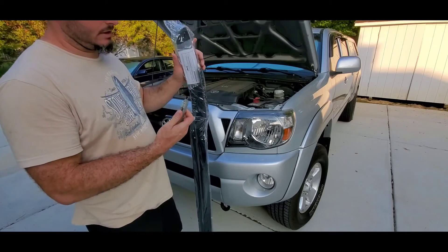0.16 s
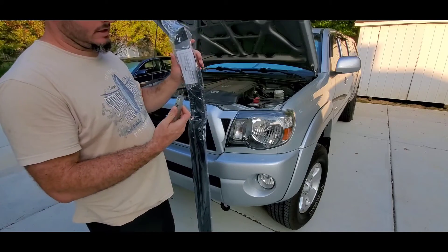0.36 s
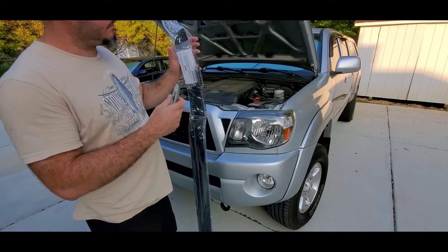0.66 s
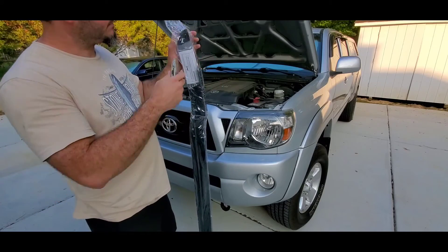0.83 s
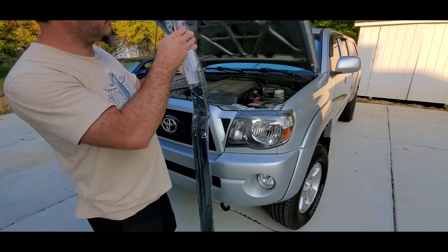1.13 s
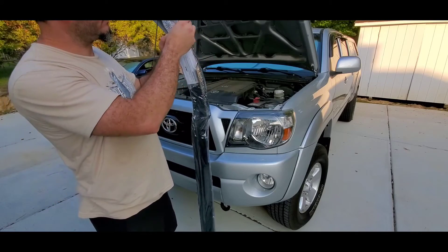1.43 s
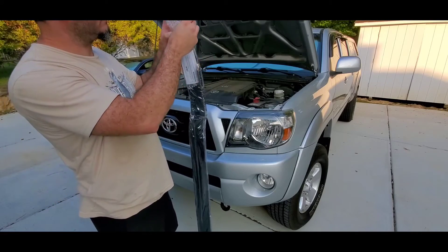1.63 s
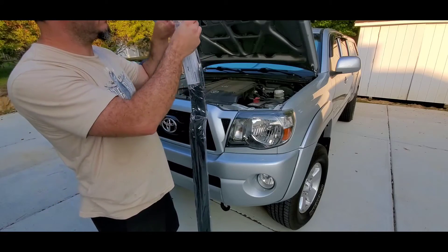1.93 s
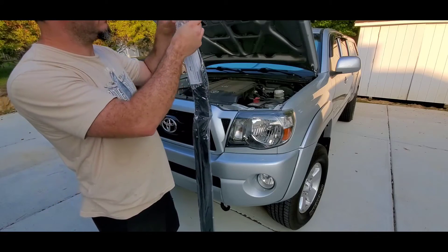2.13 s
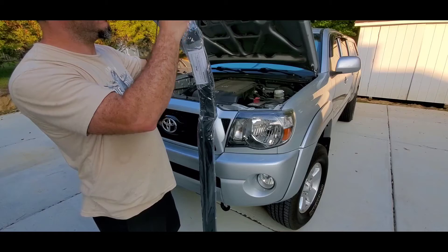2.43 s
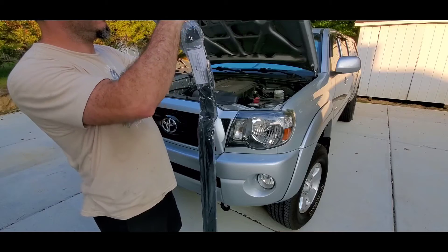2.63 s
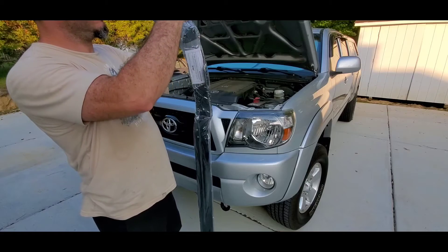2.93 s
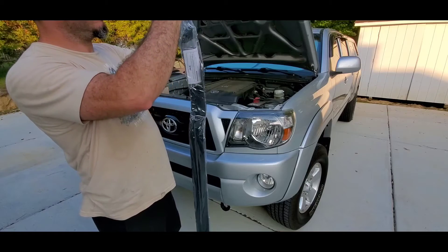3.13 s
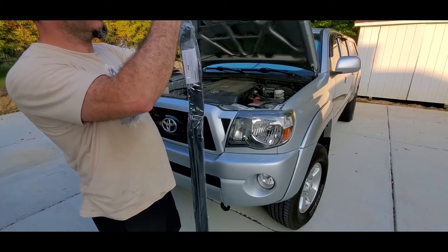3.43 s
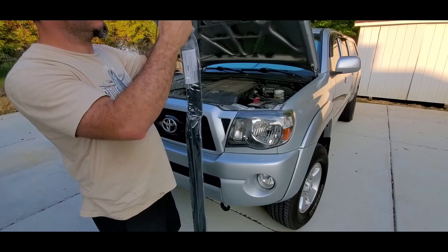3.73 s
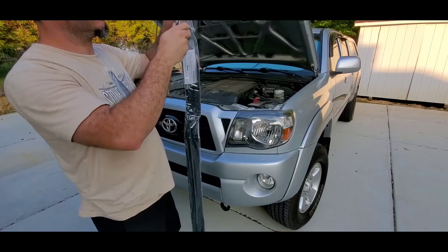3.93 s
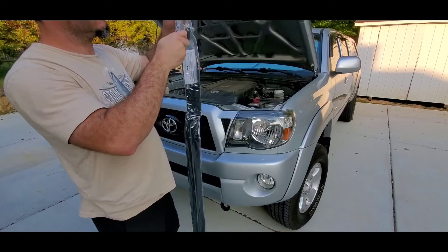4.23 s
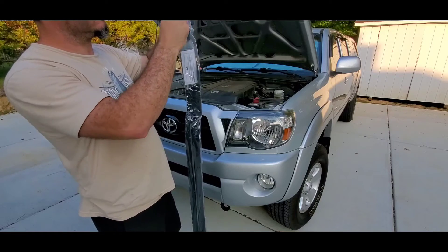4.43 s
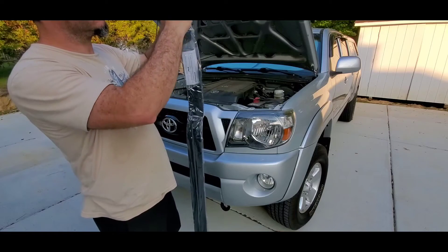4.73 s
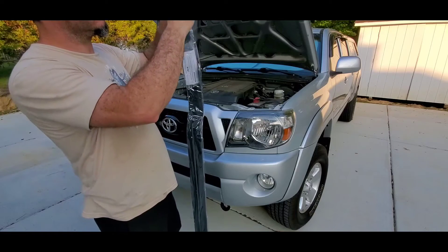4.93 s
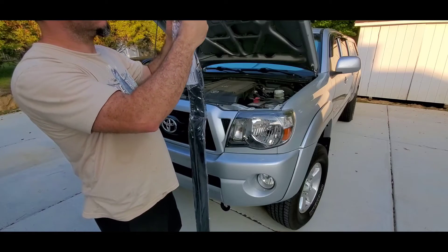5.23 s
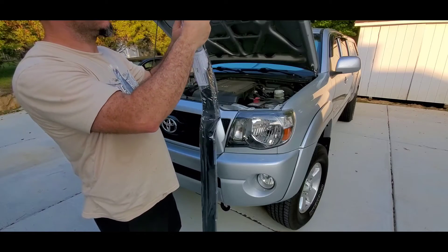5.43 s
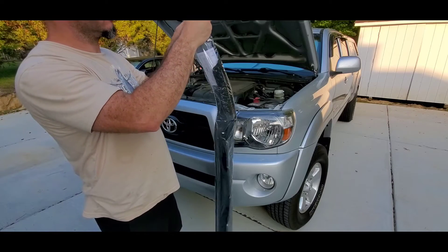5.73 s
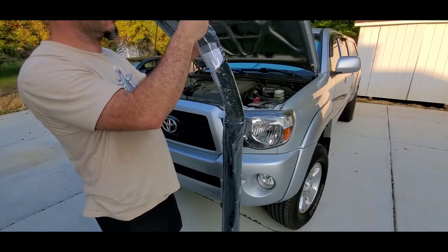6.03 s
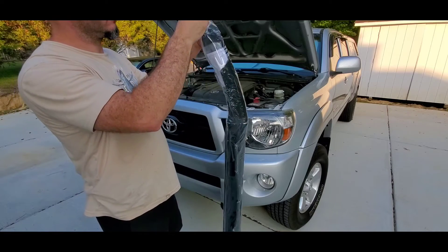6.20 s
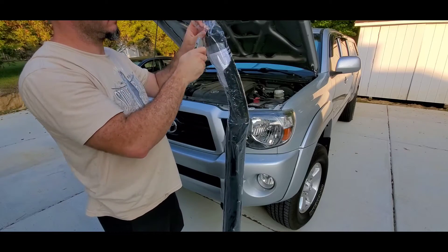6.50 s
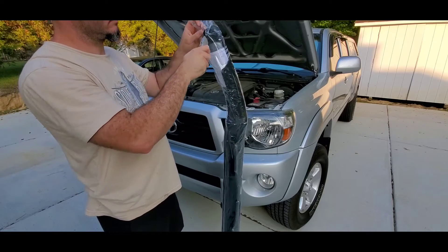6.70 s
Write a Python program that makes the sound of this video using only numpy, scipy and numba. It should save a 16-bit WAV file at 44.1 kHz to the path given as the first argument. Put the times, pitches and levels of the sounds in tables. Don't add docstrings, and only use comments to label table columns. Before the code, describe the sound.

Close, crisp stereo sound of plastic film being handled outdoors. A quick metal blade-lock click comes first, then near quiet, then irregular bursts of crinkling, crackling and bright snapping with deeper folds giving way. Brief gaps separate the pulls; the strongest cluster comes in the second half before fading to a lull and a last small rustle. Low far-off traffic and steady high insects remain underneath, with only short, tight outdoor reflections.

```python
import sys
import numpy as np
from scipy import signal
from scipy.fft import rfft, irfft, next_fast_len
from scipy.io import wavfile
from scipy.ndimage import map_coordinates
from numba import njit

SR = 44100
rng = np.random.default_rng(int(sys.argv[2]) if len(sys.argv) > 2 else 0)


def store_pcm(level_fs):
    pcm = np.round(np.clip(level_fs, -1, 1) * 32767).astype(np.int16)
    wavfile.write(sys.argv[1], SR, np.atleast_2d(pcm).T)


def to_linear_factor(level_db):
    exponent = np.asarray(level_db, float) / 20
    return 10 ** exponent


N = 302455

# lowest f/Hz, highest f/Hz, life/cycles
PANELS = [
    (327, 1967, 3.7),
    (1990, 7770, 4.55),
    (7330, 17200, 8.8),
]
# t/s, level/dB
FOLDS = [(.7398, -35), (0.9466, -13), (1.11, -13.5), (1.252, -31), (1.3544, -13.5), (1.5114, -29),
         (1.737, -22), (1.9476, -16.5), (2.1363, -20), (2.6751, -19.5), (1.7243, -20), (2.86, -21),
         (3.0496, -23.5), (3.077, -22), (3.2043, -17.5), (3.4742, -17), (3.687, -15), (3.7363, -19.5),
         (3.9899, -27.5), (4.1826, -10), (4.212, -13.5), (4.3019, -28.5), (4.6584, -21), (4.9485, -30),
         (5.378, -17.5), (5.6742, -12.5), (6.1743, -16), (1.277, -29.5), (6.7668, -22.5), (6.778, -22.5)]
# t/s, level/dB
CRACKS = [(1.0373, -10.5), (1.1352, -15.5), (1.164, -13), (1.439, -17.5), (1.7727, -22.5), (2.0004, -11),
          (2.3107, -15.5), (2.4328, -27), (2.7117, -7), (2.8253, -10.5), (2.888, -20), (2.9836, -18.5),
          (3.2618, -15), (3.287, -10), (6.4467, -37.5), (3.414, -16.5), (3.5135, -18), (3.6262, -17.5),
          (4.0212, -20), (4.1447, -10.5), (4.6927, -15.5), (4.9755, -15), (5.027, -12), (5.0519, -9),
          (5.1052, -20), (5.1549, -13), (5.2926, -12.5), (5.8312, -13.5), (6.1198, -13.5), (6.7336, -22.5)]
# t/s, level/dB
SPLITS = [(.9096, -21.5), (.969, -13.5), (1.3254, -17.5), (1.5513, -11.5), (1.6317, -14.5), (1.65, -17),
          (1.7853, -21), (1.8315, -27), (1.898, -25), (1.9126, -22), (2.096, -26.5), (3.9618, -27),
          (2.9087, -21), (3.1152, -18.5), (3.6067, -18), (4.151, -9), (4.4206, -30), (4.767, -15),
          (4.904, -14), (5.0197, -12), (5.2096, -12.5), (5.2355, -18.5), (5.2768, -10.5), (5.4954, -10),
          (5.5667, -9), (5.7834, -14), (6.0359, -14.5), (6.2158, -17.5), (6.272, -24), (6.5168, -31.5)]
# t/s, level/dB
POPS = [(.851, -27.5), (1.017, -12.5), (1.3216, -15.5), (1.4095, -13.5), (1.803, -19.5), (1.8665, -24.5),
        (1.9868, -9), (2.0108, -13.5), (2.054, -12), (2.18, -12.5), (2.4834, -17.5), (2.6319, -11),
        (2.801, -15), (3.085, -15), (3.6649, -17.5), (3.8324, -17), (3.8523, -16), (3.9242, -23),
        (4.387, -27.5), (4.5458, -21), (4.591, -20), (4.724, -11.5), (4.888, -16.5), (4.964, -16.5),
        (5.3622, -10.5), (5.5799, -6), (5.595, -9), (5.923, -11.5), (5.9946, -19.5), (6.8225, -19.5)]
# t/s, level/dB
TICKS = [(.8807, -14.5), (0.9885, -17.5), (1.046, -12.5), (1.6169, -21.5), (1.711, -18.5), (1.966, -23),
         (2.1321, -26), (2.2998, -14), (2.3497, -14.5), (2.4015, -25.5), (2.4505, -24.5), (2.6075, -16),
         (2.6176, -13.5), (2.9678, -18), (3.5634, -16), (3.751, -18.5), (4.1175, -25), (4.157, -8),
         (4.7375, -16.5), (4.8196, -12.5), (4.853, -15), (6.839, -21), (5.0104, -11.5), (5.425, -15),
         (5.5195, -10.5), (5.7644, -12), (6.753, -20), (6.11, -15), (6.2246, -18), (6.7186, -30)]
KINDS = (FOLDS, CRACKS, SPLITS, POPS, TICKS)


def unit(x):
    return x / np.sqrt(np.mean(x ** 2) + 1e-20)


def along(points, hz):
    f, v = np.transpose(points)
    return np.interp(np.log(hz + 1), np.log(f + 1), v)


def wobble(rate_hz):
    knots = rng.standard_normal(int(N * rate_hz / SR) + 4)
    return map_coordinates(knots, [np.arange(N) * rate_hz / SR])


def filtered(x, response):
    m = next_fast_len(N + 8192)
    return irfft(rfft(x, m) * response(np.fft.rfftfreq(m, 1 / SR)), m)[..., :N]


@njit
def add(out, start, step, size, length):
    for g in range(len(start)):
        z = size[g]
        for i in range(start[g], min(start[g] + length[g], len(out))):
            out[i] += z.imag
            z *= step[g]


def rings(s, hz, tau_s, size, lag_s, twist_rad):
    out = np.zeros((2, N))
    pole = (2j * np.pi * hz - 1 / tau_s) / SR
    step = np.exp(pole).ravel()
    length = (7 * tau_s * SR).astype(np.int64).ravel()
    ports = (out[0], s * SR, 0 * twist_rad), (out[1], (s + lag_s) * SR, twist_rad)
    for port, at, turn in ports:
        start = np.ceil(np.clip(at, 0, N)).astype(np.int64)
        first = size * np.exp(pole * (start - at) + 1j * turn)
        add(port, start.ravel(), step, first.ravel(), length)
    return out


def creases(s, size, panel, spread_s, count):
    low_hz, high_hz, cycles = panel
    u = rng.random((len(s), 3, count))
    n = rng.standard_normal((len(s), 3, count))
    hz = low_hz * (high_hz / low_hz) ** ((np.arange(count) + u[:, 0]) / count)
    tau_s = cycles * to_linear_factor(3.83 * n[:, 0]) / hz / np.pi
    share = to_linear_factor(3.5 * n[:, 1])
    share = share / np.linalg.norm(share, axis=1, keepdims=True)
    at_s = s[:, None] - spread_s * np.log((1 - u[:, 1]) * (1 - u[:, 2]))
    lag_s = .00018 + .00004 * n[:, 2, :1]
    twist_rad = 0.8 * n[:, 2] * (hz / 2000) ** 0.3
    return rings(at_s, hz, tau_s, size[:, None] * share, lag_s, twist_rad)


def rush(spectrum, lag_s):
    # f/Hz, left-right likeness
    alike = [(60, 0.98), (150, 0.97), (400, 0.28), (1000, 0.48), (4000, 0.13)]

    def mid_side(hz):
        turn = np.arccos(np.clip(along(alike, hz), -1, 1)) / 2
        return to_linear_factor(along(spectrum, hz)) * [np.cos(turn), np.sin(turn)]

    mid, side = filtered(rng.standard_normal((2, N)), mid_side)
    late = lambda hz: np.exp(np.outer([0, -2j * np.pi * lag_s], hz))
    return unit(filtered(np.array([mid + side, mid - side]), late))


def outdoors():
    # f/Hz, density/dB per Hz
    traffic = [(15, -41), (32, -9), (57, -0.5), (90, -10), (170, -17.5), (500, -16.5), (1300, -23.5),
               (2800, -37), (5500, -36), (9000, -42), (13000, -37), (16000, -40)]
    # f/Hz, density/dB per Hz
    insects = [(5200, -38), (6000, -11), (6700, 1), (7600, -4), (8300, -27), (9000, -47)]
    # f/Hz, level/dB, start/s, end/s
    hums = [
        (318, -59, -1, 1.2),
        (134.4, -59, 2.5, 4.6),
    ]
    t = np.arange(N) / SR
    out = to_linear_factor(-49 + 0.18 * wobble(3.8)) * rush(traffic, lag_s=0.00037)
    for hz, db, start_s, end_s in hums:
        fade = np.clip(np.minimum(t - start_s, end_s - t) / 0.064, 0, 1)
        level = to_linear_factor(db + 2.4 * wobble(8.97)) * fade
        out += level * np.sin(2 * np.pi * hz * t + 1.8 * wobble(11))
    hiss_level = to_linear_factor(-54.5 + 0.78 * wobble(1.2) + 0.65 * wobble(60))
    return out + hiss_level * rush(insects, lag_s=.0001)


def touches():
    # t/s, peak level/dB, f/Hz
    contacts = [(.013, -32.5, 715), (1.357, -20, 1050), (.357, -38.5, 790), (.437, -44, 3520),
                (.745, -34, 1400), (2.62, -37, 270), (3.2, -30.5, 356), (3.878, -26, 1200),
                (4.185, -27, 230), (4.22, -19.5, 830), (5.043, -21, 410), (5.35, -28.5, 374),
                (5.8, -23.5, 372), (6.53, -38, 1000), (6.587, -36.5, 734)]
    s, db, pitch_hz = np.transpose(contacts)[..., None]
    n = rng.standard_normal((3, len(s), 9))
    hz = pitch_hz * to_linear_factor(1.9 * n[1] * np.minimum(1, 900 / pitch_hz) ** 1.5)
    size = to_linear_factor(db - 6.5 + 2 * n[2])
    return rings(s + .006 * abs(n[0]), hz, 0.0032 + 0.98 / hz, size, 0.00021, 0.73 * n[1])


def knife():
    # t/s, peak level/dB
    click = [
        (0.202, -13),
    ]
    # f/Hz, level/dB, t60/s
    modes = [(1570, -8, 0.034), (1980, -10.5, 0.026), (2500, -14, .03), (3490, -12, 0.02), (4870, 4, .025),
             (6640, -3, 0.063), (11100, 8, 0.017), (13650, -2, 0.059)]
    (s, db), = click
    hz, level_db, t60_s = np.transpose(modes)
    n = rng.standard_normal((3, 3, len(hz)))
    at_s = s + np.array([[.0012], [.0026], [.0038]]) + 0.000175 * n[0]
    force = to_linear_factor(db + np.array([-9, -6, -2]))
    size = force[:, None] * to_linear_factor(level_db - 10.0 + 2 * n[1])
    tau_s = t60_s / np.log(1000)
    ring = rings(at_s, hz + 0 * at_s, tau_s + 0 * at_s, size, -0.000093, 1.4 * n[2])
    rub_s = s + .035 * rng.standard_normal(120)
    rub_size = to_linear_factor(db - 29) * np.ones(len(rub_s))
    slide = creases(rub_s, rub_size, (1500, 16000, 5), spread_s=0.00091, count=5)
    lock = creases(at_s[:, 0], 1.7 * force, (3000, 16000, 9), spread_s=0.00045, count=14)
    return filtered(ring + slide + lock, lambda hz: hz ** 4 / (hz ** 4 + 1400 ** 4))


def snaps():
    colours = [
        (0.5, -12),
        (-4.5, -1.5),
        (-11.5, -1.5),
        (-14.5, -12),
        (-7, -7.5),
    ]
    s, db = np.concatenate(KINDS).T
    large_db, fine_db = np.repeat(colours, [len(kind) for kind in KINDS], axis=0).T
    large = creases(s, to_linear_factor(db + large_db + 5.5), PANELS[0], spread_s=0.000916, count=8)
    middle = creases(s, to_linear_factor(db + 6), PANELS[1], spread_s=0.000452, count=14)
    fine = creases(s, to_linear_factor(db + fine_db + 11), PANELS[2], spread_s=.0006, count=18)
    return large + middle + fine


def effort():
    # start/s, peak/s, rustle level/dB, 20 dB fade/s, large folds re rustle/dB
    pulls = [(0.834, 1.056, -27, 0.17, -1), (1.303, 1.441, -26.5, .11, -0.5), (1.523, 1.64, -33.5, 0.2, -8),
             (1.68, 1.726, -36, 0.2, -3), (1.835, 2.003, -26, 0.13, -10.5), (2.154, 2.248, -24, 0.14, -7.5),
             (2.39, 2.49, -37, .06, -3), (2.563, 2.7, -23.5, .33, -0.5), (2.85, 2.973, -33, 0.04, -10.5),
             (3.03, 3.298, -23.5, 0.44, -1), (3.587, 3.688, -25, 0.07, 0), (3.812, 3.854, -38, 0.3, -8),
             (3.899, 4.03, -42, 0.04, 6), (4.128, 4.17, -21.5, 0.0752, 3.5), (4.38, 4.42, -48, .06, -13),
             (4.585, 4.76, -30.5, 0.67, 0.5), (4.873, 5.043, -19.5, 0.1441, -3.5),
             (5.19, 5.367, -22, 0.07, 2), (5.4, 5.505, -29, 0.39, 1), (5.544, 5.832, -22, 0.1, 0.5),
             (5.915, 5.945, -26.5, .27, -3.5), (6.093, 6.128, -25, .16, -2.5),
             (6.41, 6.452, -48.5, .07, 8.5), (6.714, 6.863, -36.5, .2, 10)]
    swell = 0.84
    fine_grows, hard_db = 1.13, -30.5
    hush, hush_s = 0.49, 0.013
    start, peak, db, fade_s, large_db = np.transpose(pulls)[..., None]
    t = np.arange(0, N / SR + .002, .002)
    rise = np.clip((t - start) / (peak - start), 1e-4, 1) ** swell
    pull = to_linear_factor(db - 20 * np.maximum(t - peak, 0) / fade_s) * rise
    before_s = np.concatenate(KINDS)[:, :1] - t
    stall = hush * (before_s > 0) * np.exp(-(before_s / hush_s) ** 2)
    pull = pull * np.prod(1 - stall, axis=0)
    layers = pull, pull * to_linear_factor(large_db), pull * (pull / to_linear_factor(hard_db)) ** (fine_grows - 1)
    return [np.interp(np.arange(N) / SR, t, np.linalg.norm(layer, axis=0)) for layer in layers]


def rustle():
    draws = rng.random((round(N / SR * 800), 2))
    s = draws[:, 0] * N / SR
    size = to_linear_factor(-3.6 * np.log(1 - .97 * draws[:, 1]))
    middle_gain, large_gain, fine_gain = effort()
    clumps = to_linear_factor(2.33 * wobble(45) + 0.78 * wobble(140))
    large, middle, fine = (unit(clumps * creases(s, size, panel, spread_s=.0006, count=3))
                           for panel in PANELS)
    return to_linear_factor(-4) * large_gain * large + to_linear_factor(-4) * middle_gain * middle + to_linear_factor(-6) * fine_gain * fine


def wrapping():
    # f/Hz, gain/dB
    radiation = [(40, -38), (250, -18.5), (400, -13), (1200, 4), (2500, 1.5), (4000, 4), (6500, 5),
                 (9300, -3), (13000, 3.5), (16000, 2.5)]
    return filtered(rustle() + snaps(), lambda hz: to_linear_factor(along(radiation, hz)))


def yard(x):
    # f/Hz, t60/s
    decay = [(300, 0.15), (2000, 0.094), (8000, 0.05), (15000, 0.045)]
    # delay/s, level/dB
    bounces = [
        (.0065, -13.5),
        (.0086, -14),
        (0.0151, -19.5),
    ]
    out = np.zeros((2, N))
    turn = np.arange(N) * 7 // SR % 5
    for k in range(5):
        hz, t, z = signal.stft(rng.standard_normal((2, SR // 5)), SR, nperseg=128)
        fade = to_linear_factor(-60 * t / along(decay, hz)[:, None])
        tail = signal.istft(z * fade, SR, nperseg=128)[1]
        s = np.arange(tail.shape[1]) / SR
        tail = to_linear_factor(-4.5) * tail / np.linalg.norm(tail[0])
        blur = sum(to_linear_factor(db) * (s > at) * np.exp(-abs(s - at) / 0.00037) for at, db in bounces)
        tail += 0.53 * blur * rng.standard_normal(tail.shape)
        late = np.pad(x * (turn == k), ((0, 0), (30, 0)))
        out += signal.fftconvolve(late, tail, axes=1)[:, :N]
    return filtered(out, lambda hz: hz ** 2 / (hz ** 2 + 350 ** 2))


def scene():
    near = (wrapping() + touches() + knife()) * to_linear_factor([[.4], [-.4]])
    return near + yard(near) + outdoors()


def band_limit(x):
    return signal.sosfilt(signal.butter(12, 16100, fs=SR, output="sos"), x)


def record(dry):
    x = dry / (1 + abs(dry) ** 8) ** (1 / 8)
    x = filtered(x, lambda hz: hz ** 2 / (hz ** 2 + 25 ** 2) / (1 + (hz / 15700) ** 120))
    return band_limit(0.99 * x)


dry = scene()
out = record(dry)
store_pcm(out)
```